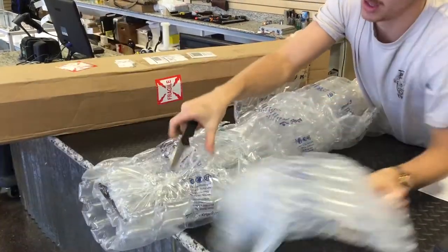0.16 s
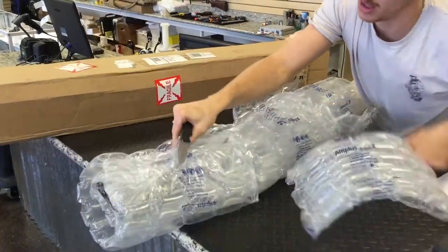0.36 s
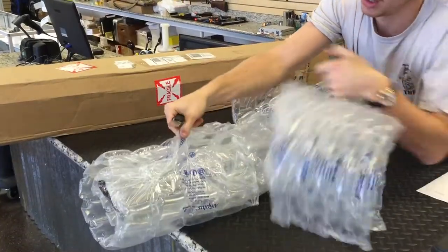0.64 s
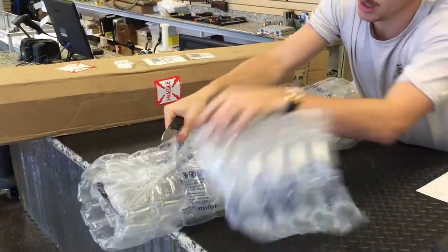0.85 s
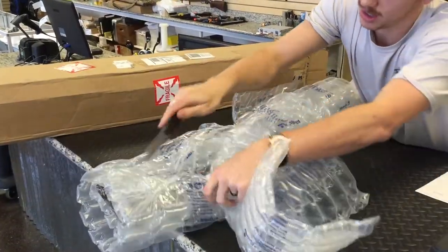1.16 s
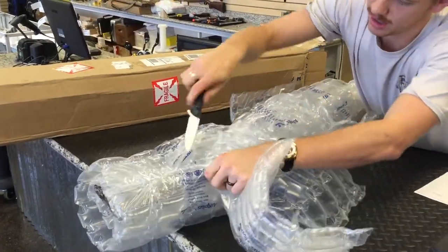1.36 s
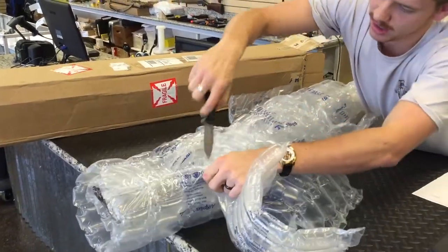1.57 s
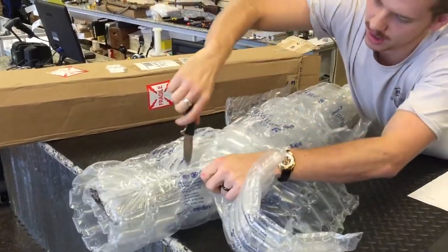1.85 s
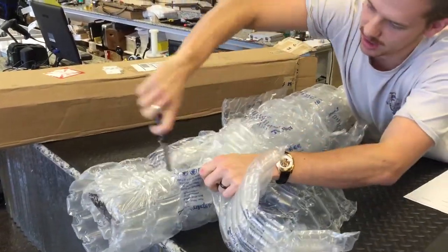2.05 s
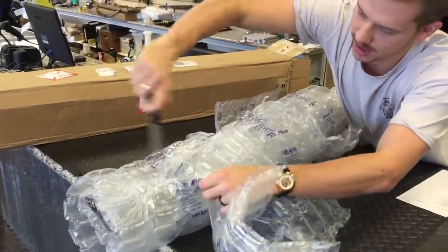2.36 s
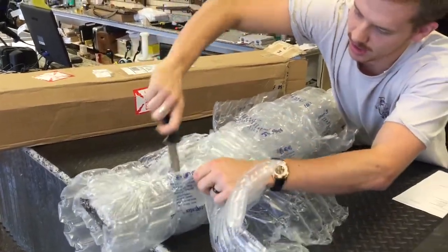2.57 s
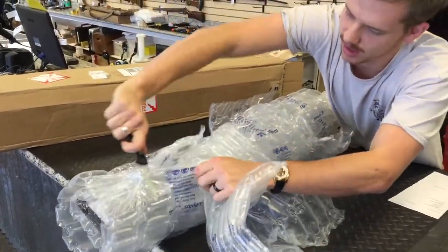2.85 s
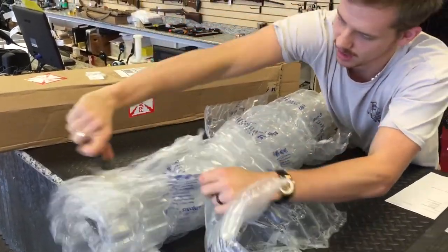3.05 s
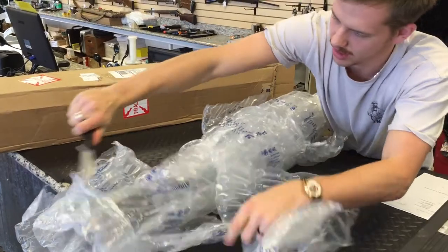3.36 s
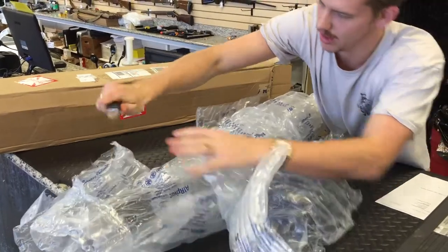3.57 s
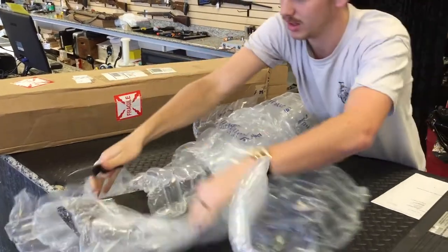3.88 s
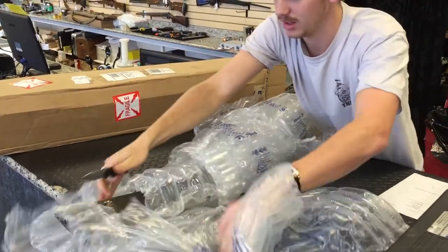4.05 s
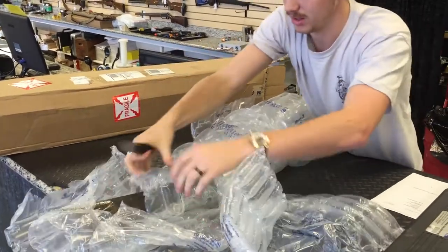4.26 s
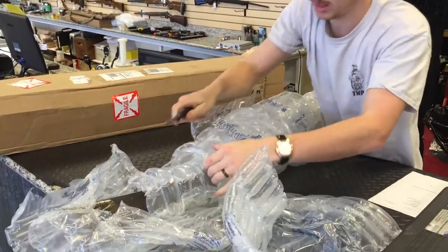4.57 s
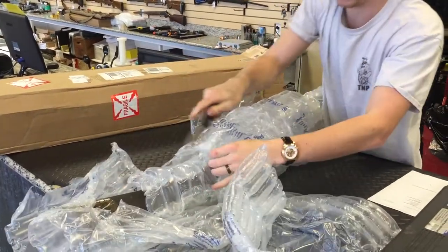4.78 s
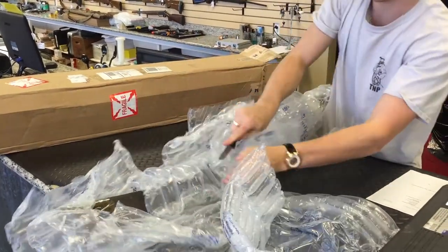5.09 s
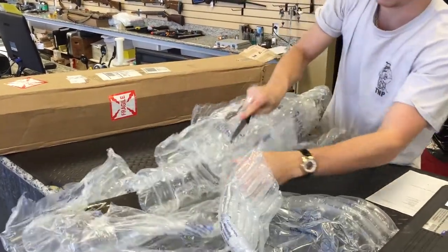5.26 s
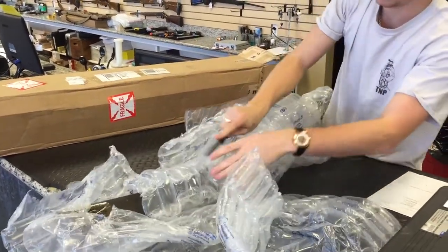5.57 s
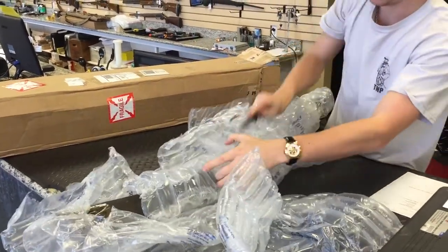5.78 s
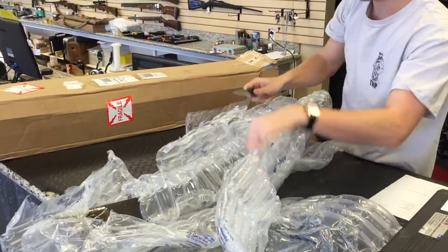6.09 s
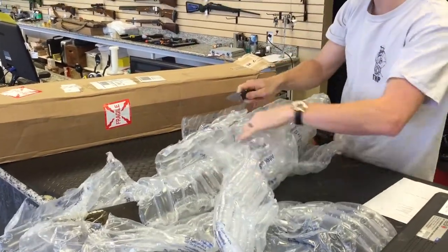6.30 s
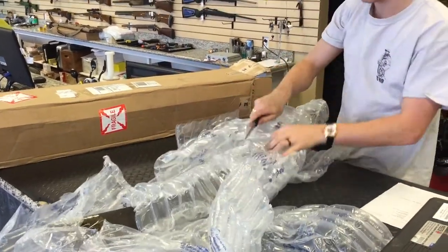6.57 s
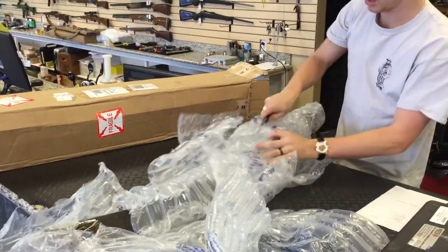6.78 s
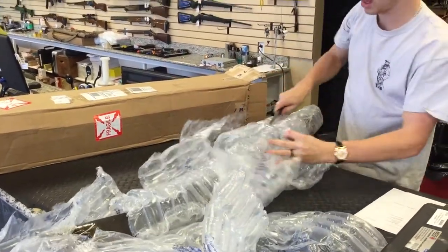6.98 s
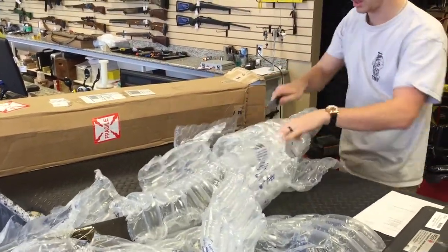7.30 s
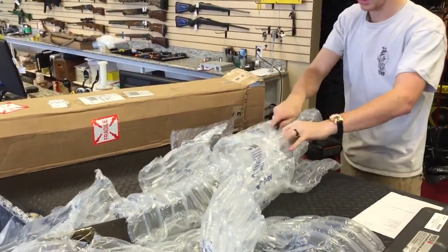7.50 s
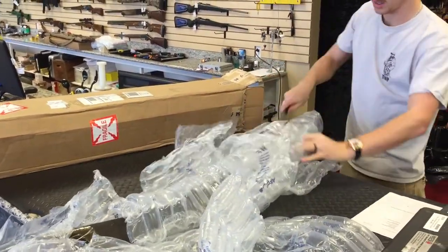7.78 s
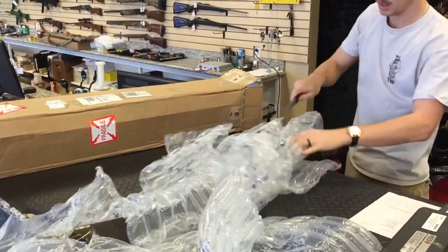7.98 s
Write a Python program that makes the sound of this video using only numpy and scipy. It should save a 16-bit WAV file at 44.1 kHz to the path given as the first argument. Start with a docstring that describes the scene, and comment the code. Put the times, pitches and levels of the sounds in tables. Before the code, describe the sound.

Close, dry-sounding handling of inflated plastic packing wrap on a shop counter, with short room echoes and a faint, steady low ventilation rumble. From 0 to 1.5 seconds the film rustles and crackles brightly in uneven pushes, with hard crease snaps around 0.5, 0.9 and 1.2 and a soft low flutter of a swung loose sheet. It quietens to small ticks until about 1.9, when the blade bites. Sharp air-cell pops strike near 2.2, 2.7 and 2.9, with tiny rips, and a very strong one with a deep boom at 3.2. Rustling follows; a boomy burst at 4.0, a very brief squeak at 4.4, and snaps with a low boom around 4.5. Further pops come at 5.1 and 5.75, then a heavy thumping cluster from 6.8 to 7.0. Crinkling continues, with a last group of bursts and short tears around 7.6 to 7.9.

```python
"""Someone handles inflated plastic packing wrap on a shop counter, then cuts it open with a knife. First the
film rustles, its creases snap and a loose sheet flutters: noise and tiny clicks shaped by each move. Then the
blade bursts air cells (cracks, rings and thumps) and tears the film (chains of clicks). Now and then the bundle
knocks on the counter (slow low rings); midway the taut skin squeaks (gliding overtones). More bursts and tears
follow. Counter and shop echo it all, over a steady low ventilation rumble."""
import sys
import numpy as np
from scipy import signal
from scipy.fft import rfft, irfft, next_fast_len
from scipy.io import wavfile
from scipy.ndimage import uniform_filter1d, map_coordinates

SR = 44100
rng = np.random.default_rng(int(sys.argv[2]) if len(sys.argv) > 2 else 0)


def file_out(sig):
    """Save sig as 16-bit WAV at sys.argv[1]."""
    # one column per channel
    cols = np.atleast_2d(sig).T
    # limit, then scale
    lim = np.clip(cols, -1, 1)
    pcm = np.round(lim * 32767).astype(np.int16)
    wavfile.write(sys.argv[1], SR, pcm)


N = 358929  # length of the scene in samples

# a hand pushes, pulls or drags the wrap: start_s, length_s, rise_s, level_db, brightness_db
MOVES = [(0.0, 0.03, 0.02, -44.0, -11), (0.091, 0.08, 0.09, -34.5, -6), (0.181, 0.17, 0.07, -32, -4.5),
         (0.29, 0.035, 0.03, -30, -6), (0.37, 0.29, 0.04, -32.0, -4), (0.707, 0.09, 0.11, -34.0, -4.5),
         (0.841, 0.08, 0.11, -34.5, -5), (0.927, 0.18, 0.07, -30, -0.5), (1.058, 0.05, 0.04, -29, -5),
         (1.111, 0.16, 0.12, -30.5, -3), (1.25, 0.18, 0.19, -33.5, 0.5), (1.4, 0.05, 0.05, -30.5, -11),
         (1.59, 0.06, 0.05, -46, -5), (1.679, 0.25, 0.03, -41.5, -4.5), (1.932, 0.3, 0.15, -32.5, -6.5),
         (2.251, 0.17, 0.2, -32.5, -5), (2.48, 0.12, 0.03, -50, -5), (2.632, 0.19, 0.14, -29.5, -7),
         (2.853, 0.11, 0.04, -31.5, -3), (3.001, 0.21, 0.05, -27, -4), (3.208, 0.34, 0.08, -34.5, -2),
         (3.51, 0.14, 0.11, -38.5, -3.5), (3.79, 0.27, 0.16, -26.0, -3.5), (4.09, 0.15, 0.06, -38.0, -1.5),
         (4.31, 0.27, 0.03, -34.0, -10.5), (4.633, 0.23, 0.04, -41.5, -6), (4.86, 0.22, 0.12, -35.5, -9),
         (5.081, 0.22, 0.04, -29.0, -6), (5.343, 0.15, 0.05, -38.0, -7.5), (5.551, 0.11, 0.07, -38.0, -1.5),
         (5.629, 0.16, 0.11, -26.5, -6.5), (5.788, 0.26, 0.12, -34.0, -6), (6.023, 0.25, 0.15, -33.0, -1),
         (6.299, 0.24, 0.04, -33.0, -12), (6.538, 0.11, 0.12, -34.0, -0.5), (6.649, 0.4, 0.13, -29.5, -4),
         (7.049, 0.23, 0.09, -40.5, -1.5), (7.36, 0.29, 0.02, -41, 0.5), (7.59, 0.26, 0.11, -33, -6.5),
         (7.869, 0.19, 0.04, -40.5, -2.5)]
# a stiff crease flips over: start_s, level_db, treble_db
SNAPS = [(0.026, -26, 6), (0.167, -13.5, 1), (0.213, -14, 5), (0.468, -6, -3), (0.492, 1.5, -4),
         (0.669, -5.5, 1), (0.733, -23, 10), (0.745, -23, 4), (0.903, -11, 2.5), (0.911, -5, -4),
         (1.004, -21, -2), (1.222, 2, 2), (1.399, -15, -1), (1.457, -14, 8.5), (1.52, -26, 0),
         (1.537, -34, 11), (1.589, -28.5, 14.5), (1.651, -18, -5), (1.692, -21, 5), (1.709, -24.5, 13.5),
         (1.726, -29, 16), (1.783, -24, 9), (1.843, -29, 13), (1.936, -22.5, 14.5), (1.955, -4, -12),
         (1.981, -29, 15), (2.002, -21, 8), (2.26, -7, -7), (2.285, -25, 2), (2.461, -12, 4.5),
         (2.506, -33, 12), (2.521, -34, 10), (2.562, -24, -4), (2.595, -30, 15), (2.635, -28, 11),
         (2.644, -27, 9), (2.661, -22, 7), (2.676, -14, -2), (2.684, -24, 11), (2.72, -12, 10),
         (2.817, -2, -10), (2.883, 2.5, -10), (2.979, -5, -9), (3.028, -9, 0), (3.045, -1, -2),
         (3.052, -8.5, -1), (3.572, -18, 11), (3.639, -27, 11), (3.692, -30, 16), (3.72, -26.5, 11),
         (3.76, -26.5, 10.5), (3.816, -30, 4), (4.056, 5.5, -12), (4.303, -29, 16), (4.312, -34, 11),
         (4.5, 0, -10), (4.504, -13, 8), (4.542, -1.5, -2), (4.555, -4.5, 2.5), (4.66, -22, 8),
         (4.685, -32, 1), (4.713, -32, 8), (4.723, -32, 2), (4.858, -29, 7), (4.899, -19, -1),
         (4.96, -5.5, -5), (5.003, -3.5, -13), (5.232, -0.5, -31), (5.349, -17, 6), (5.433, -17, 6),
         (5.718, -10, 5), (5.911, -4, -4), (5.959, -10, -1), (6.411, -2, -27), (6.514, -3, -36),
         (6.554, -13.5, 3), (6.783, 6, -8), (6.796, 5.5, -7), (7.011, -6, 6), (7.277, -8.5, -8),
         (7.314, -7.5, -26), (7.534, -23, 6), (7.545, -31, 7), (7.674, -11, -2), (7.697, -1, -4),
         (7.869, -16, 3), (7.903, -3, -20), (7.977, -15, 6)]
# the blade bursts an air cell: start_s, level_db, thump_db, cell_pitch_hz, treble_db
POPS = [(1.865, -3.5, -7.5, 1110, -24), (2.171, 9, -3, 580, 6.5), (2.191, 4, 2, 1260, -5),
        (2.21, -1.5, 0.5, 1270, 10), (2.741, 10, -4, 1106, -4.5), (2.899, 13, 3, 754, 2.5),
        (2.917, 12, 3, 590, 4.5), (2.932, 2.5, 2.5, 305, 3), (3.105, -1, -11, 1250, 9.5),
        (3.177, 18.5, 5.5, 1125, -1), (3.182, 5.5, -3, 330, -6), (4.023, 5, -1, 1354, 8),
        (4.803, 1, -11.5, 360, -0.5), (5.126, 9, 2.5, 737, 4), (5.300, -1, -11, 717, 7.5),
        (5.749, 12.5, 9.5, 708, 3.5), (5.811, -2, 2, 366, -22), (6.343, -4, -19, 730, -13),
        (6.765, 8.5, 0, 570, 2), (6.847, 5, -0.5, 356, 3), (6.934, -11, 5, 301, 6),
        (6.946, 14.5, 12, 339, -4.5), (7.0, 1, -14, 1570, 12.5), (7.006, 3.5, 3, 475, 9),
        (7.63, 3, -10, 1155, 5), (7.757, 9, 6, 980, -17), (7.771, 13.5, 9, 570, -8),
        (7.791, -5, 4, 710, -17)]
# the blade tears the film: start_s, length_s, level_db, brightness_db, skin_pitch_hz
TEARS = [(1.862, 0.012, -21.5, -6, 1100), (1.872, 0.048, -39.5, 7, 670), (2.173, 0.039, -24.5, 6.5, 1280),
         (2.9, 0.052, -21.5, -3, 1420), (3.102, 0.023, -24.5, 5, 1410), (3.15, 0.065, -23.5, 9, 1910),
         (4.527, 0.032, -28, 2.5, 1110), (5.126, 0.03, -30, 3.5, 704), (5.758, 0.053, -40, -8, 400),
         (6.398, 0.056, -37, -15, 830), (6.999, 0.024, -22.5, 6.5, 605), (7.692, 0.029, -25.5, -1.5, 945),
         (7.746, 0.022, -19.5, -5, 754), (7.777, 0.029, -24, -4, 675), (7.911, 0.025, -29, 0, 1083)]
# steel sticks and slips on the film:
# start_s, length_s, start_pitch_hz, middle_pitch_hz, end_pitch_hz, level_db, rasp_db
SQUEAKS = [(4.351, 0.015, 444, 402, 374, -28.5, -13), (4.366, 0.039, 357, 335.5, 316, -17, -12),
           (4.412, 0.025, 1337, 1415, 1380, -21, -11)]
# the bundle knocks on the counter with a deep low boom: start_s, level_db, pitch_hz
BOOMS = [(3.188, -4.5, 60.4), (4.04, -11, 58), (4.557, -10, 94), (6.954, -3, 62)]
# a loose sheet is swung through the air: start_s, length_s, level_db
SWINGS = [(0.5, 0.28, -50.5), (0.856, 0.36, -53)]

# tone colour of rustling and snapping film: pitch_hz, level_db (per Hz)
FILM = [(71, -44), (120, -4.5), (167, -9.5), (289, -5.5), (454, -10), (698, -3.5), (1140, -3.5), (1980, 0),
        (3050, -5), (4320, -1), (4880, -3.5), (9210, -4.5), (10400, -7), (15000, -6.5), (16000, -11)]
# tone colour of bursting and tearing film: pitch_hz, level_db (per Hz)
BURST = [(150, -14.5), (250, 0), (348, 2), (460, -9.5), (698, -2), (875, -5.5), (1040, -3), (1470, -2.5),
         (1950, 3.5), (2810, -5), (3280, -5), (5540, -6), (7700, -9), (14900, -14.5), (16000, -9)]
# soft boom of the air cushion: pitch_hz, level_db (per Hz)
CUSHION = [(25, -47), (60, -21), (100, -3), (150, -3), (190, -1), (270, -3), (420, -10.5), (1000, -38),
           (4000, -87)]
# what the taut skin passes of a squeak's overtones: pitch_hz, level_db
SKIN = [(340, -0.5), (690, 0.5), (1020, -7), (1400, -13), (1700, -1.5), (2040, -5), (2380, -28), (2750, -7),
        (3000, -8), (3450, -24), (4100, -16), (5200, -17), (16000, -58)]
# tone colour of the swung sheet: pitch_hz, level_db (per Hz)
SHEET = [(60, -28), (130, -10), (190, 4), (290, 3), (420, -18), (1200, -50)]
# tone colour of the ventilation: pitch_hz, level_db (per Hz)
VENT = [(20, -47), (40, -11), (58, 10.5), (85, -2.5), (170, -2), (400, -31), (1500, -23), (5000, -35),
        (16000, -44)]
# time the shop's echo takes to fall by 60 dB: pitch_hz, fade_s
SHOP = [(100, 0.54), (500, 0.4), (2000, 0.18), (6000, 0.34), (16000, 0.14)]

REST_DB, REST_BRIGHT_DB = -53, -12  # the held wrap never lies quite still
SETTLE_DB_PER_S = 160  # the film settles when a move ends
CREASES_PER_S, EASY_MOVE_DB = 4500, -36  # rate of tiny buckles in a move of that level
FLUTTER_DB, FLUTTER_GROWS = 4, 0.15  # film shaken by a 0 dB snap, and extra dB of it per dB of strength
SLIP_SCATTER, GRIP_SCATTER_DB = 0.05, 3  # unevenness of a squeak: share of its pitch, and level in dB
SKIN_RING_HZ, SKIN_RING_S, SKIN_RING_DB = 1450, 0.11, -22.5  # the taut cell sings on after a squeak
TOP_HZ = 16000  # nothing is kept above this pitch


def amp(db):
    """Turn decibels into a plain multiplier."""
    return 10 ** (np.asarray(db) / 20)


def unit(x):
    """Scale x to mean power 1."""
    return x / np.sqrt(np.mean(x ** 2) + 1e-20)


def norm(x):
    """Scale x to total energy 1."""
    return x / (np.linalg.norm(x) + 1e-12)


def along(points, hz):
    """Read a table of (pitch, value) points at any pitch, on a log pitch axis."""
    point_hz, value = np.transpose(points)
    return np.interp(np.log(hz + 1), np.log(point_hz + 1), value)


def wobble(rate):
    """Draw a smooth random curve with rate knots a second."""
    knots = rng.standard_normal(int(N * rate / SR) + 4)
    return map_coordinates(knots, [np.arange(N) * rate / SR])


def add(track, s, x):
    """Mix x into the track at time s, in seconds."""
    i = max(round(s * SR), 0)
    track[i:i + len(x)] += x[:max(len(track) - i, 0)]


def colour(x, spectrum, size=4096):
    """Filter x to the given tone colour, without any sound before its cause."""
    level_db = np.maximum(along(spectrum, np.fft.rfftfreq(size, 1 / SR)), -80)
    # folding the cepstrum packs the filter's energy as early as possible
    cepstrum = irfft(np.log(amp(level_db)))
    cepstrum[1:size // 2] *= 2
    cepstrum[size // 2 + 1:] = 0
    response = irfft(np.exp(rfft(cepstrum)))
    return signal.fftconvolve(x, response)[:len(x)]


def shelf(x, db, corner_hz=2800):
    """Lift or lower the treble of x by db, in two gentle steps."""
    for step in range(2):
        low = signal.lfilter(*signal.butter(1, corner_hz, fs=SR), x)
        x = low + amp(db / 2) * (x - low)
    return x


def ring(t, hz, t60):
    """A vibration that takes about half a cycle to start and falls by 60 dB in t60 seconds."""
    return np.sin(2 * np.pi * hz * t) * amp(-60 * t / t60) * (1 - np.exp(-2 * hz * t))


def clicks(rate, spread_db, size):
    """Tiny buckles of the film at random moments, of very mixed size, at mean power 1."""
    share = np.clip(rate / SR, 1e-4, 1)  # chance of a click in each sample
    sizes = amp(spread_db * np.clip(rng.standard_normal(size), -3, 2.5))
    signs = rng.choice([-1, 1], size)
    happens = rng.random(size) < share
    # dividing by the root of the chance keeps the power even when the rate changes
    return unit(happens * signs * sizes / np.sqrt(share))


def crack(t, t60, flutter_db, width):
    """One sharp pressure pulse (width in seconds), then the loose film flutters to rest."""
    pulse = norm((1 - t / width) * np.exp(-t / width))
    flutter = norm(clicks(14000, 1.2, len(t)) * amp(-60 * t / t60))
    return pulse + amp(flutter_db) * flutter


def moments(level_db, count):
    """Random sample positions that crowd where the wrap moves most."""
    activity = np.cumsum(amp(0.5 * level_db))
    return np.searchsorted(activity, rng.random(count) * activity[-1])


def handling():
    """Each move rises, holds and settles; moves add in power and the louder one sets the brightness."""
    t = np.arange(N) / SR
    power = np.full(N, amp(REST_DB) ** 2)
    bright_sum = power * REST_BRIGHT_DB
    for s, length, rise, db, bright_db in MOVES:
        span = slice(max(round(s * SR), 0), round((s + length + 0.5) * SR))
        age = t[span] - s
        attack = np.sin(np.pi / 2 * np.clip(age / rise, 0, 1)) ** 2
        settling_db = SETTLE_DB_PER_S * np.maximum(age - length, 0)
        move_power = (attack * amp(db - settling_db)) ** 2
        power[span] += move_power
        bright_sum[span] += move_power * bright_db
    return 10 * np.log10(power), bright_sum / power


def rustle(level_db, bright_db):
    """Faster handling flips more creases, over the duller hiss of film that catches and lets go."""
    level_db = level_db + 0.5 * wobble(28)
    crease_rate = CREASES_PER_S * amp(0.6 * (level_db - EASY_MOVE_DB))
    creases = clicks(crease_rate, spread_db=3.2, size=N)
    sliding = shelf(rng.standard_normal(N), -6.5)
    film = facets(colour(creases + amp(-7) * sliding, FILM), depth_db=2.8)
    film = film * amp(level_db + 1.45 * wobble(130))
    ticks = crackles(level_db, centre_hz=3600, cycles=14, spread_db=4.5)
    # a few stiffer wrinkles stand out above the rest
    ticks += amp(9) * crackles(level_db, centre_hz=5500, cycles=7, spread_db=3, count=380)
    return shelf(film + ticks, bright_db)


def facets(x, depth_db, size=512):
    """Ever other patches of film take the strain, so the colour of the rustle keeps shifting."""
    z = signal.stft(x, nperseg=size)[2]
    # smooth random levels over pitch, then over time
    field = uniform_filter1d(rng.standard_normal(z.shape), size=7, axis=0)
    field = uniform_filter1d(field, size=3, axis=1)
    shifted = signal.istft(z * amp(depth_db * unit(field)), nperseg=size)[1]
    return unit(shifted[:len(x)])


def crackles(level_db, centre_hz, cycles, spread_db, count=2500):
    """Small separate wrinkles tick, each at its own pitch, more often while the wrap moves."""
    out, t = np.zeros(N), np.arange(SR // 100) / SR
    draws = np.clip(rng.standard_normal((count, 2)), -2.5, 2.5)
    for i, (pitch, size) in zip(moments(level_db, count), draws):
        hz = centre_hz * np.exp(1.3 * np.tanh(0.7 * pitch))
        add(out, i / SR, amp(level_db[i] + spread_db * size) * ring(t, hz, cycles / hz))
    return out


def pops(count=3):
    """A punctured cell cracks and rings unevenly; its sudden loss of pressure thumps the cushion."""
    out, t = np.zeros(N), np.arange(SR // 5) / SR
    for s, db, thump_db, cell_hz, treble_db in POPS:
        bang = norm(colour(crack(t, t60=0.02, flutter_db=4, width=0.0004), BURST))
        ratios = rng.uniform(1.4, 3.2, count)
        upper = sum(norm(ring(t, cell_hz * ratio, t60=0.025)) for ratio in ratios)
        cell = norm(norm(ring(t, cell_hz, t60=0.02)) + amp(-6) * upper)
        thump = norm(colour(crack(t, t60=0.052, flutter_db=5, width=0.00062), CUSHION))
        burst = shelf(bang, treble_db) + amp(-6) * cell
        add(out, s, amp(db) * burst + amp(thump_db) * thump)
    return out


def tears(skin_db, count=4):
    """A cut runs on in a chain of tiny ruptures, which drum on skin patches of differing tautness."""
    out, t = np.zeros(N), np.arange(SR // 100) / SR
    for s, length, db, bright_db, skin_hz in TEARS:
        u = np.linspace(0, 1, max(int(length * SR), 64))  # progress through the tear
        rip, skin = 0, 0
        for ratio in np.geomspace(0.6, 1.6, count):
            ruptures = clicks(1500, spread_db=2, size=len(u))
            patch = norm(ring(t, skin_hz * ratio, t60=0.004))
            rip = rip + ruptures
            skin = skin + signal.fftconvolve(ruptures, patch)[:len(u)]
        rip = shelf(unit(colour(rip, BURST)), bright_db)
        swell = np.abs(np.sin(np.pi * u)) ** 0.6
        add(out, s, amp(db) * (amp(-2) * rip + amp(skin_db) * unit(skin)) * swell)
    return out


def booms():
    """The bundle knocks on the counter: a deep low boom, a slow fading ring."""
    out, t = np.zeros(N), np.arange(SR // 4) / SR
    for s, db, hz in BOOMS:
        add(out, s, amp(db) * norm(ring(t, hz, t60=0.16)))
    return out


def snap(db, treble_db):
    """One crease flips with a dry tick; a stronger one shakes more of the film around it."""
    t = np.arange(SR // 25) / SR
    tick = crack(t, t60=0.018, flutter_db=FLUTTER_DB + FLUTTER_GROWS * db, width=0.0002)
    return amp(db) * shelf(norm(colour(tick, FILM)), treble_db)


def snaps(level_db, small_db, spread_db, count=130):
    """The stiff creases flip, and smaller ones of varied colour at random as the wrap moves."""
    out = np.zeros(N)
    tints = rng.uniform(-1.2, 1, (count, 2))
    for i, (size, tint) in zip(moments(level_db, count), tints):
        add(out, i / SR, snap(level_db[i] + small_db + spread_db * size, treble_db=4.3 * tint))
    for s, db, treble_db in SNAPS:
        add(out, s, snap(db, treble_db))
    return out


def squeaks(count=16):
    """Steel sticks and slips at a gliding rate and rasps at every slip; the taut cell rings on."""
    out = np.zeros(N)
    for s, length, start_hz, middle_hz, end_hz, db, rasp_db in SQUEAKS:
        u = np.linspace(0, 1, int(length * SR))  # progress through the squeak
        glide = np.polyfit([0, 0.5, 1], [start_hz, middle_hz, end_hz], 2)
        pitch_hz = np.polyval(glide, u)
        uneven_hz = pitch_hz * (1 + SLIP_SCATTER * wobble(2 * middle_hz)[:len(u)])
        phase = 2 * np.pi * np.cumsum(uneven_hz) / SR
        tone = np.zeros(len(u))
        for k in range(1, count):
            if k * middle_hz < TOP_HZ:
                overtone = np.sin(k * phase + rng.uniform(0, 2 * np.pi))
                tone += amp(along(SKIN, k * pitch_hz)) * overtone
        tone = unit(tone * amp(GRIP_SCATTER_DB * wobble(middle_hz)[:len(u)]))
        slips = (1 + np.cos(phase)) ** 2
        rasp = unit(colour(rng.standard_normal(len(u)) * slips, FILM))
        add(out, s, amp(db) * (tone + amp(rasp_db) * rasp) * np.sin(np.pi * u))
    cell = norm(ring(np.arange(SR // 10) / SR, SKIN_RING_HZ, SKIN_RING_S))
    return out + amp(SKIN_RING_DB) * signal.fftconvolve(out, cell)[:N]


def relaxing(tick_db, spread_db, count=150):
    """Bent film keeps ticking faintly as it relaxes, also between moves."""
    out = np.zeros(N)
    for when, size, tint in rng.random((count, 3)):
        add(out, when * N / SR, snap(tick_db - spread_db * size, treble_db=9 * tint))
    return out


def waved_sheet():
    """The air cells of the swung sheet wobble with a soft, low flutter."""
    t = np.arange(N) / SR
    swing = np.zeros(N)
    for s, length, db in SWINGS:
        swing += amp(db) * np.sin(np.pi * np.clip((t - s) / length, 0, 1))
    flutter = amp(2 * wobble(25.1))
    return swing * flutter * unit(colour(rng.standard_normal(N), SHEET))


def counter(x, echo_db, count=8):
    """The counter top and the carton throw back weak, early copies."""
    walls = np.zeros(SR // 50)
    delays_s = rng.uniform(0.001, 0.009, count)
    walls[(delays_s * SR).astype(int)] = rng.normal(0, 1, count)
    return amp(echo_db) * signal.fftconvolve(x, norm(walls))


def shop(x, wet_db):
    """The room's tail is fading noise, each pitch dying at its own speed."""
    hz, t, z = signal.stft(rng.standard_normal(SR // 2), SR, nperseg=256)
    fade = amp(-60 * t / along(SHOP, hz)[:, None])
    tail = signal.istft(z * fade, SR, nperseg=256)[1]
    late_tail = np.pad(norm(tail), (SR // 200, 0))  # starts 5 ms late
    return amp(wet_db) * signal.fftconvolve(x, late_tail)


def echoes(x, size=8192):
    """Each short stretch gets freshly drawn echoes, so no single random pattern colours everything."""
    out = np.zeros(N)
    dull = np.pad(shelf(x, -12.5), (0, size))
    for i in range(0, N, size // 2):  # stretches overlap by half
        part = dull[i:i + size] * np.hanning(size)
        add(out, i / SR, counter(part, echo_db=-8.5))
        add(out, i / SR, shop(part, wet_db=-12))
    return out


def ventilation():
    """The steady low rumble of the shop is noise with a deep tone colour."""
    return amp(-58) * unit(colour(rng.standard_normal(N), VENT))


def scene():
    """Everything the wrap does, its echoes and the shop's rumble."""
    level_db, bright_db = handling()
    wrap = rustle(level_db, bright_db)
    wrap += pops() + tears(skin_db=-2.5) + booms()
    wrap += snaps(level_db, small_db=15, spread_db=4)
    wrap += squeaks()
    wrap += relaxing(tick_db=-26, spread_db=10) + waved_sheet()
    return (wrap + echoes(wrap) + ventilation())[None]


def record(dry):
    """The highest peaks are rounded off and nothing above TOP_HZ is kept."""
    rounded = dry / (1 + np.abs(dry / 0.85) ** 4) ** (1 / 4)
    size = next_fast_len(N + SR // 4)
    kept = np.fft.rfftfreq(size, 1 / SR) < TOP_HZ
    return irfft(rfft(rounded, size) * kept, size)[:, :N]


dry = scene()
out = record(dry)
file_out(out)
```